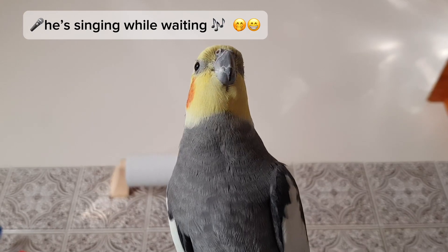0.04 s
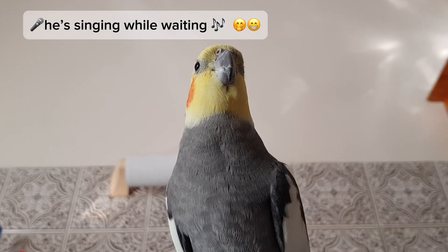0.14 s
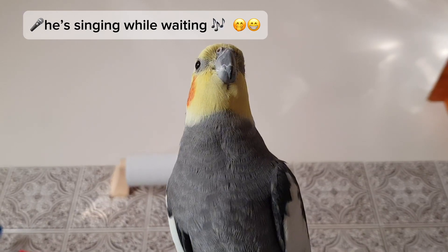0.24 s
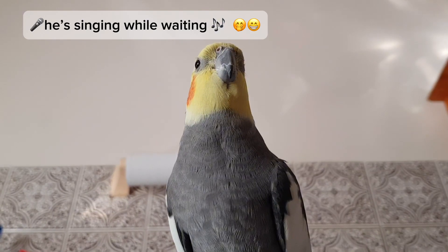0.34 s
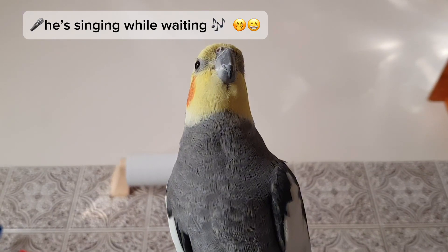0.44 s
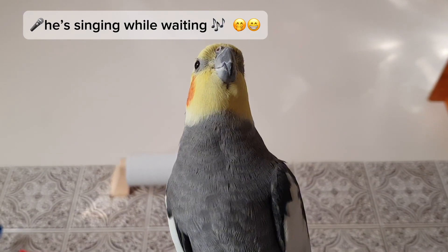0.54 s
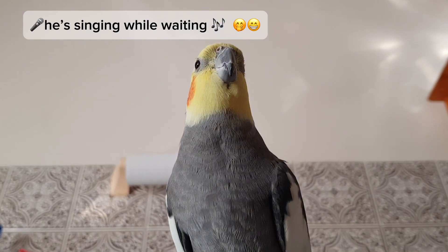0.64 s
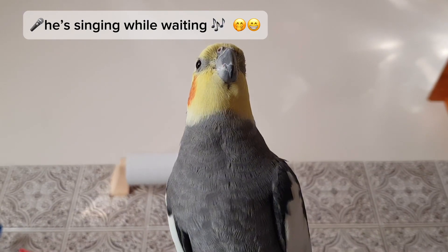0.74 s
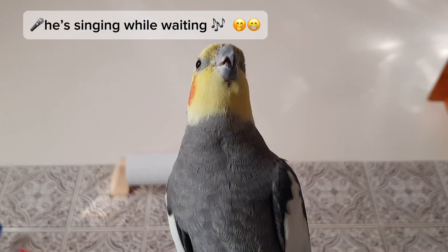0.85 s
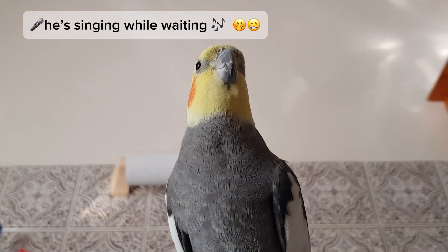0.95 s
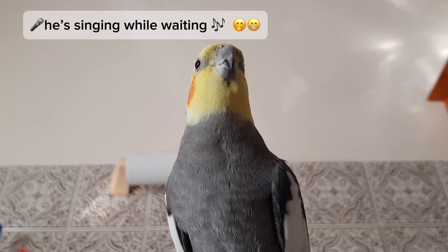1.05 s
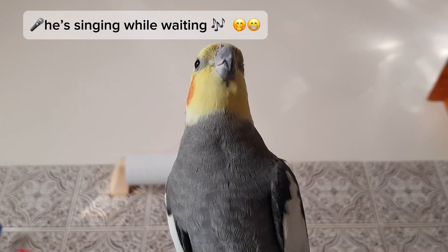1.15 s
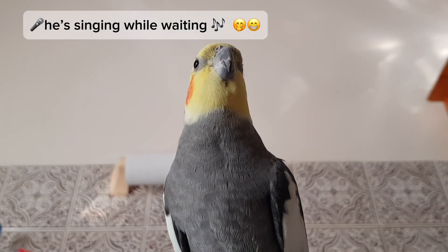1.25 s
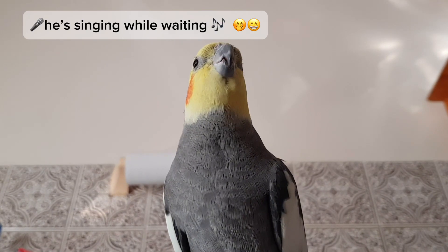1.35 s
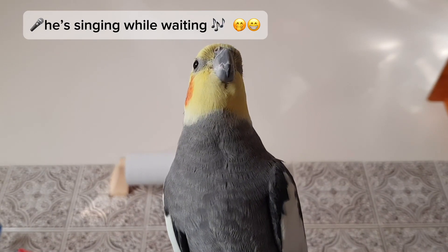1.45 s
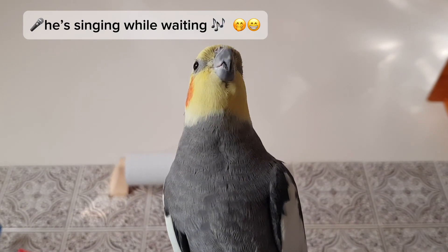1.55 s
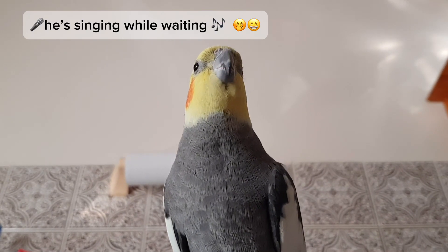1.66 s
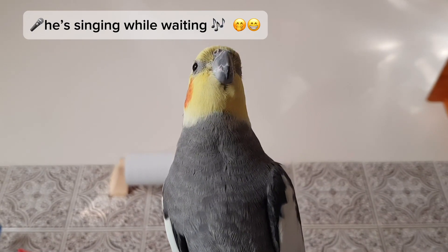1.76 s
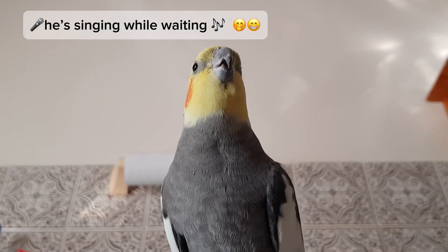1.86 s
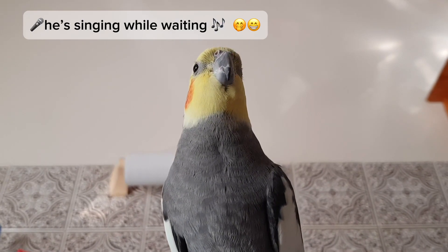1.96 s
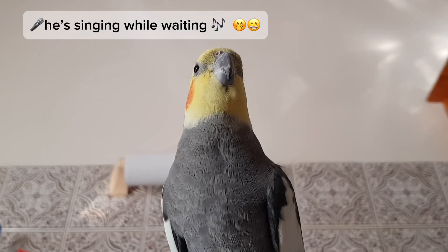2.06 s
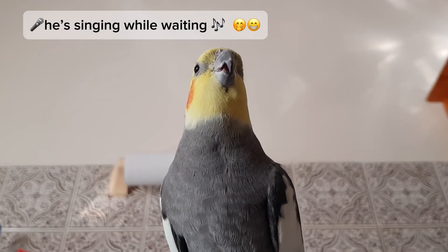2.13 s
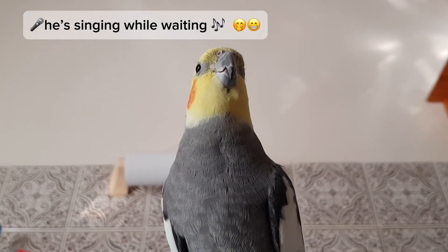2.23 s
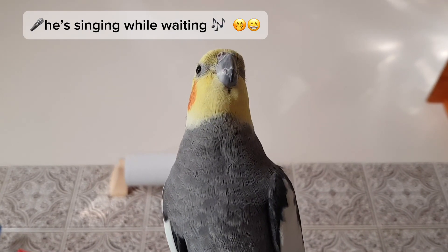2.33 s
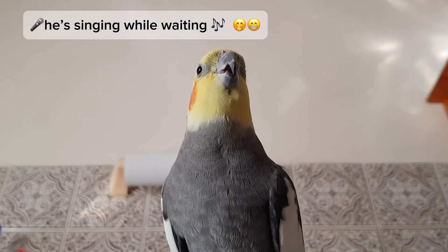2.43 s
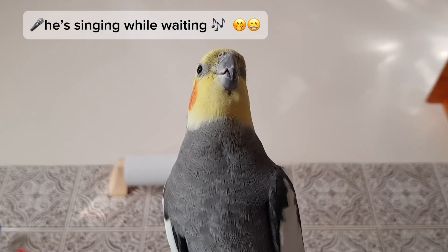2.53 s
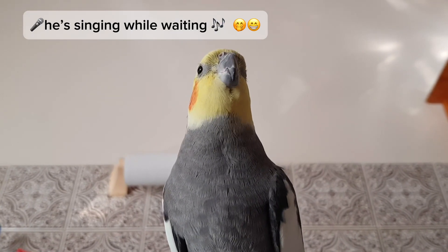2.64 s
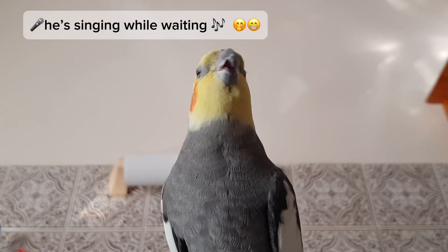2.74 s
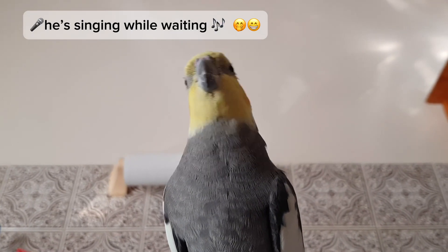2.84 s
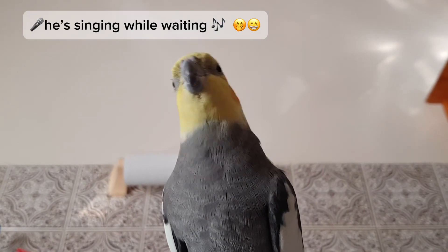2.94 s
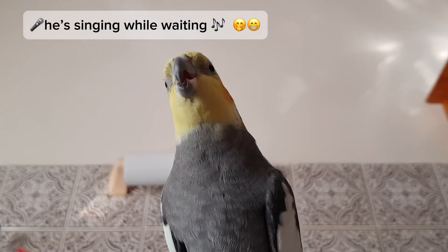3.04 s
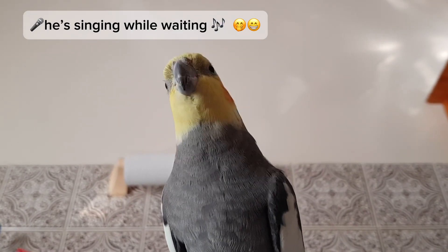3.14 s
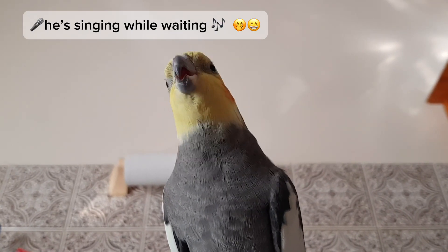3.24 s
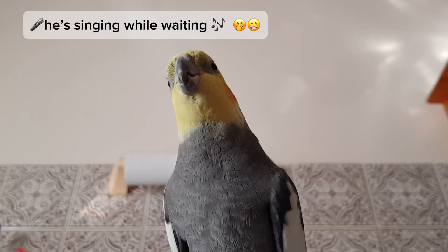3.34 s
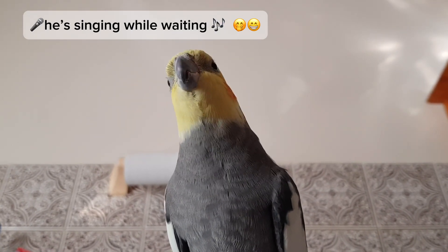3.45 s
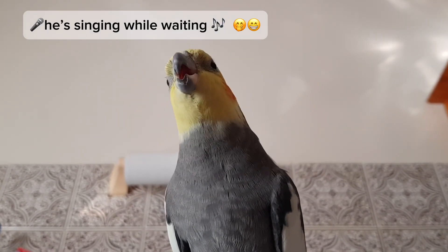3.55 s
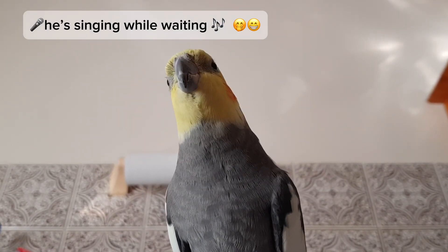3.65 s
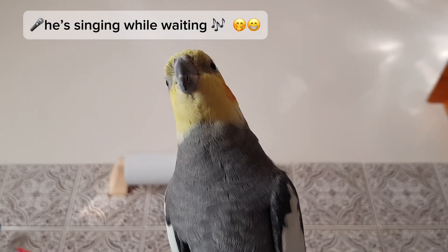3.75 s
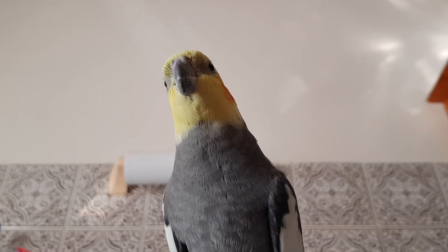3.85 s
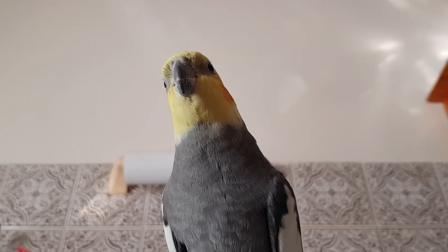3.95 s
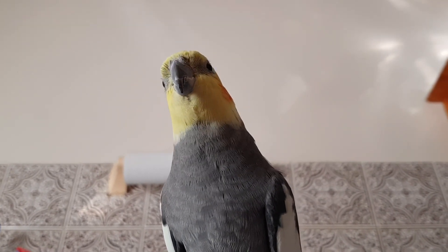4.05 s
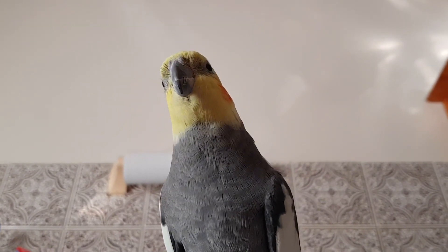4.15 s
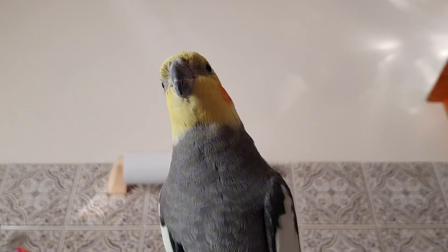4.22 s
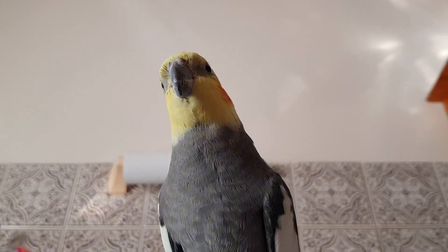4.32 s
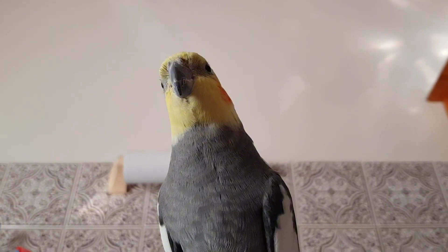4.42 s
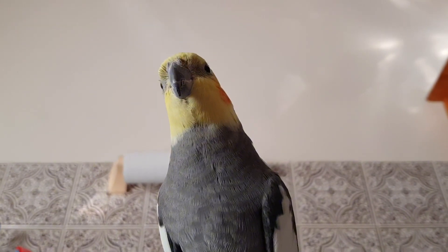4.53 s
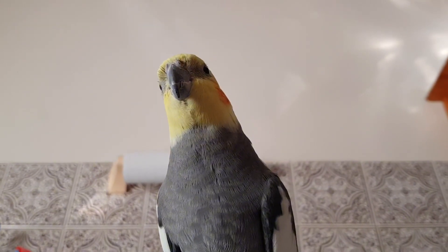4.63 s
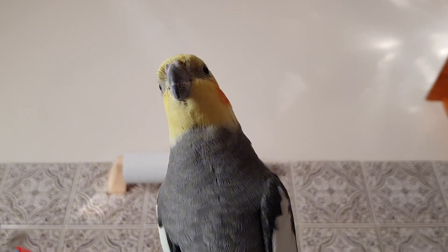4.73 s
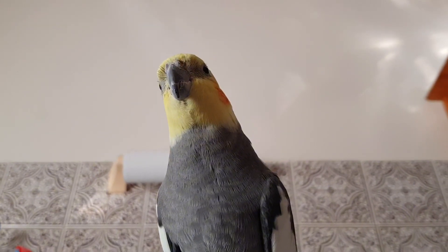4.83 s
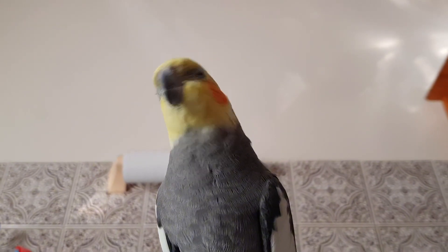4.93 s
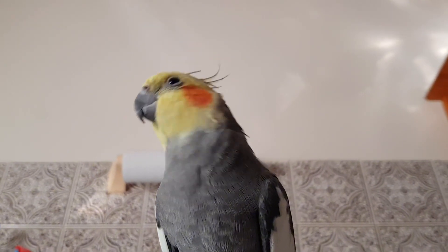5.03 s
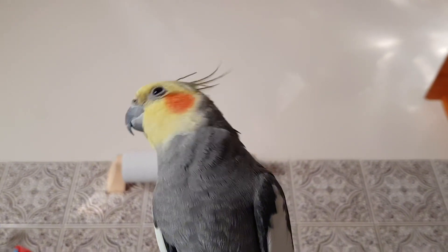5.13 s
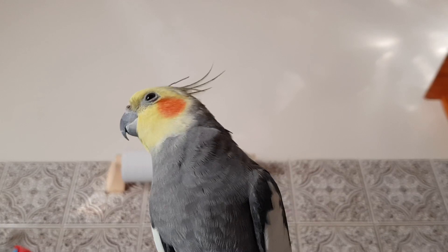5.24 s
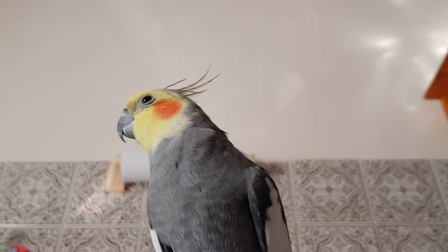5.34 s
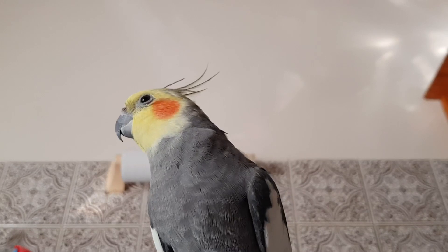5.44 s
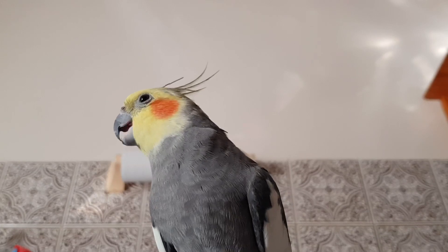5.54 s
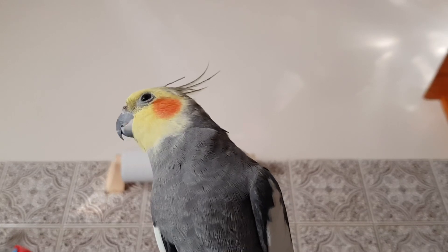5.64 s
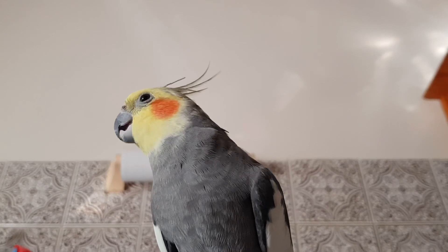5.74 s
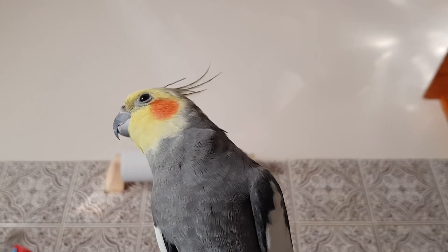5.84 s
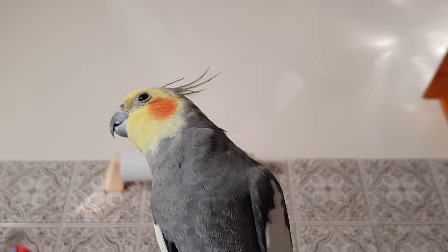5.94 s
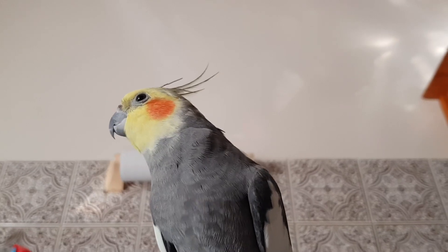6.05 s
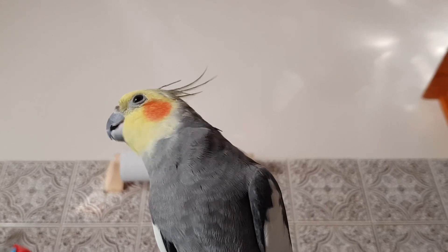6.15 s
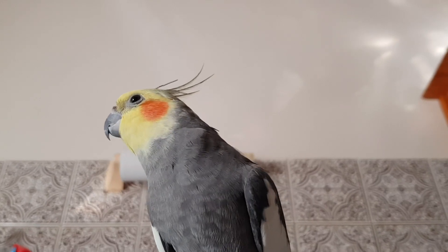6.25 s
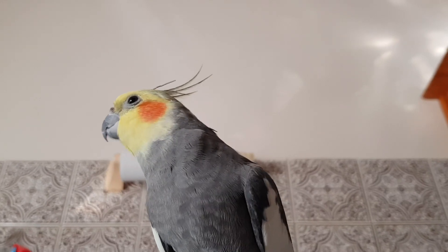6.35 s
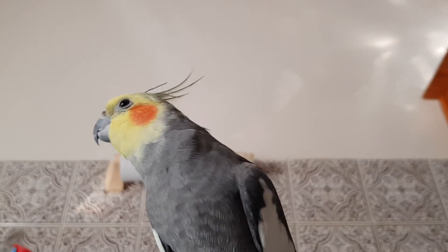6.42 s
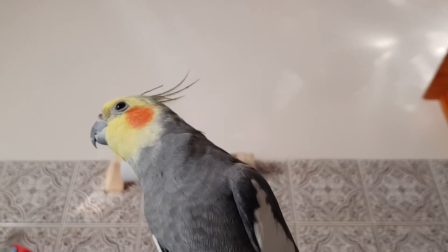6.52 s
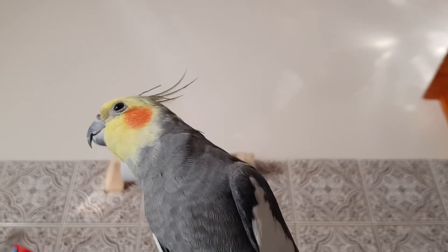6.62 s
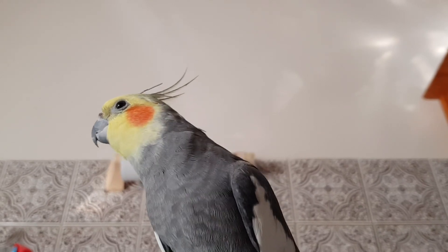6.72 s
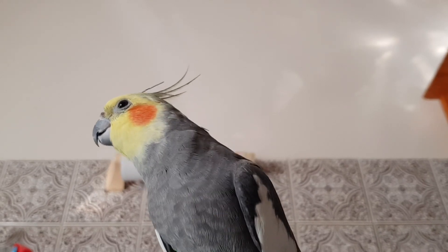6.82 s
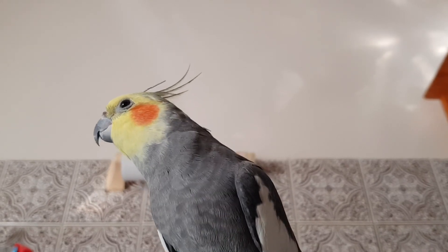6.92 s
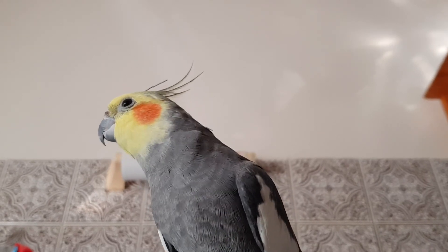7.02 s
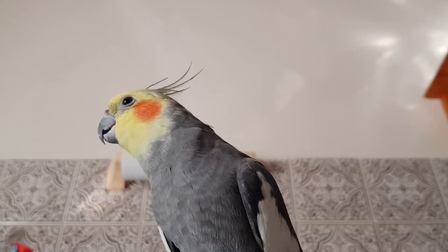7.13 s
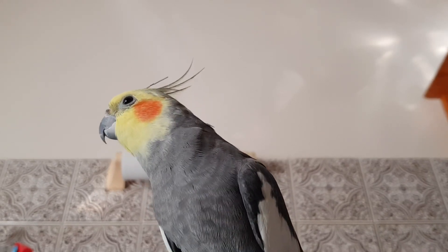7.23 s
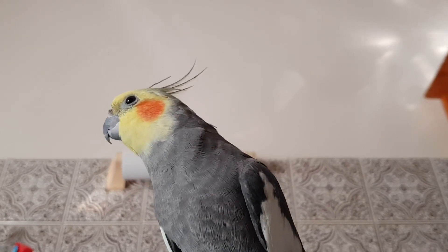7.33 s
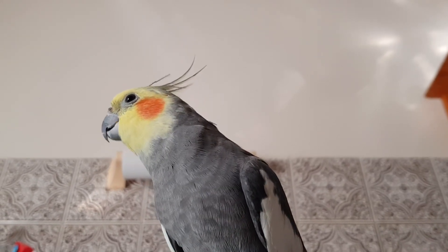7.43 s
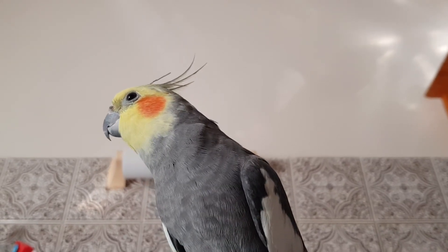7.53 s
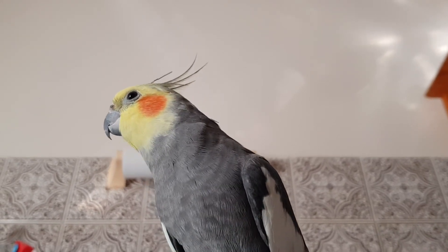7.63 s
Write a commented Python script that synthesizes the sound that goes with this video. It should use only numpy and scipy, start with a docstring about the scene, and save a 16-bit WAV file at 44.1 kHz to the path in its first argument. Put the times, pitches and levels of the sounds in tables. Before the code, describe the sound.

A cockatiel close by whistles a run of short bright rising notes, pauses, then gives softer raspy squawks and nasal chirps over faint room hum.

```python
"""A quiet room hums; then a cockatiel sings close by: eleven loud scooped whistles and three faint notes.
After a pause come four raspy squawks and four arched, nasal calls; far outside an engine gathers speed.
The voice is a harmonic stack plus torn half-order lines, coloured by the throat; sips are banded noise.
Hum and engine are sines over shaped noise; reverberation is banded decaying noise."""
import sys
import numpy as np
from scipy import signal
from scipy.fft import rfft, irfft
from scipy.io import wavfile
from scipy.ndimage import uniform_filter1d

SR = 44100
rng = np.random.default_rng(int(sys.argv[2]) if len(sys.argv) > 2 else 0)


def put_to_file(sound):
    """Save the sound as 16-bit audio at rate SR, in the file named by the first command-line argument."""
    columns = np.atleast_2d(sound).T  # one column per channel
    safe = np.clip(columns, -1, 1)
    whole_steps = np.round(safe * 32767)
    wavfile.write(sys.argv[1], SR, whole_steps.astype(np.int16))


N = 338688
TIME = np.arange(N) / SR
CUTOFF_HZ = 15900


def from_db(db):
    """Decibels to amplitude ratio."""
    return 10 ** (np.asarray(db) / 20)


def rms_one(x):
    """Scale to unit rms."""
    return x / np.sqrt(np.mean(x ** 2) + 1e-20)


def at_hz(points, hz):
    """Read a spectrum on a log-frequency axis."""
    known_hz, values = np.transpose(points)
    return np.interp(np.log(np.maximum(hz, 1)), np.log(known_hz), values)


def noise(colour, size):
    """Noise with a given spectrum; rms 1."""
    hz = np.arange(size // 2 + 1) * SR / size
    gain = from_db(at_hz(colour, hz))
    return rms_one(irfft(rfft(rng.standard_normal(size)) * gain, size))


def spread(colour, side_db):
    """Stereo noise: a part common to both channels plus a weaker part in opposite phase."""
    common = noise(colour, size=N)
    opposed = noise(colour, size=N) * [[1], [-1]]
    return common + from_db(side_db) * opposed


def wander(t, rate_hz):
    """Random values of zero mean and unit spread, drawn at rate_hz and joined by straight lines."""
    return np.interp((t - t[0]) * rate_hz, np.arange(4096), rng.standard_normal(4096))


def note_time(start_s, length_s):
    """The samples that a note covers, and its age in seconds at each."""
    at, size = int(start_s * SR), int(length_s * SR)
    return slice(at, at + size), TIME[:size]


def envelope_db(age, onset_db, attack_s, hold_s, fall_db_per_s):
    """Ease up from the onset level to 0 dB, hold, then fall steadily."""
    rise_db = onset_db * np.clip(1 - age / attack_s, 0, 1) ** 1.24
    return rise_db - fall_db_per_s * np.maximum(age - attack_s - hold_s, 0)


def bump(age, at_s, width_s):
    """A smooth rise to 1 and back."""
    return np.exp(-((age - at_s) / width_s) ** 2)


def glide(age, times, pitches):
    """Pitch gliding through a few turning points, with rounded corners."""
    return uniform_filter1d(np.interp(age, times, pitches), size=400, mode="nearest")


# Reverberation decay. Each row: frequency in Hz, nominal 60 dB decay time in s.
ROOM_T60 = [(500, 0.26), (1500, 0.3477), (3000, 0.19), (6000, 0.2947), (12000, 0.25), (16000, .22)]
# Share of the voice spreading into the room. Each row: frequency in Hz, level in dB.
ROOM_SHARE = [(500, 0.94), (3000, 1), (5000, 0.84), (9000, 0), (15000, 0.77)]


def room(x, lingering_db=-21, lingering=2.4):
    """Diffuse reverberation, different at each ear: band decay times differ and a weak part lingers."""
    t = np.arange(SR * 3 // 4) / SR
    edges_hz = np.geomspace(250, 18000, 13)
    hz = np.arange(len(t) // 2 + 1) * SR / len(t)
    white = rfft(rng.standard_normal((2, len(t))))
    tail = 0
    for low, high in zip(edges_hz, edges_hz[1:]):
        band = irfft(white * ((hz >= low) & (hz < high)), len(t))
        centre_hz = np.sqrt(low * high)
        fall = np.log(1000) * t / at_hz(ROOM_T60, centre_hz)
        decay = np.exp(-fall) + from_db(lingering_db) * np.exp(-fall / lingering)
        decay = decay * np.clip(t / 0.002, 0, 1)   # the nearest surfaces answer almost at once
        tail = tail + band * decay / np.linalg.norm(decay) * from_db(at_hz(ROOM_SHARE, centre_hz))
    return signal.fftconvolve(x[None], tail, axes=1)[:, :N]


def place(x, lag_ms, right_db, wet_db):
    """The sound reaches the right microphone a little later and louder; the room answers in both."""
    delay = np.exp(-2j * np.pi * np.arange(N // 2 + 1) * SR / N * lag_ms / 1000)
    left = x * from_db(-right_db / 2)
    right = irfft(rfft(x) * delay, N) * from_db(right_db / 2)
    return np.array([left, right]) + from_db(wet_db) * room(x)


def rasp(t, pitch, phase, colour, tear_hz, bright_db, clump_db=3.0):
    """Irregular flapping: the period doubles, each half-order line torn in strength and phase; rms about 1."""
    out, power = 0, 0
    for half_order in np.arange(1, 26) / 2:
        hz = half_order * pitch
        treble = np.interp(hz, [2400, 3400], [0, 1])
        gain = from_db(at_hz(colour, hz) + bright_db * treble) * (hz < CUTOFF_HZ)
        torn_sine = wander(t, tear_hz) * np.sin(half_order * phase)
        torn_cosine = wander(t, tear_hz) * np.cos(half_order * phase)
        out = out + gain * (torn_sine + torn_cosine)
        power = power + gain ** 2
    return out / np.sqrt(power) * from_db(clump_db * wander(t, 310))


def syrinx(t, pitch, tone_db, overtone_db, rasp_db, throat, rasp_colour, jitter, rough_jitter,
           tear_hz, flutter_db, muffle_db=0, upper_db=0, waver_db=0):
    """One note: a harmonic stack coloured by the throat; the rougher it is, the more its pitch shakes."""
    rasp_gain = from_db(rasp_db)
    roughness = rasp_gain / (rasp_gain + from_db(tone_db) + from_db(overtone_db))
    shake = jitter * wander(t, 450) + rough_jitter * roughness * wander(t, 900)
    phase = 2 * np.pi * np.cumsum(pitch * (1 + shake)) / SR
    note = from_db(tone_db) * np.sin(phase)
    for k in range(2, 14):
        # a closed beak swallows the low overtones
        colour_db = at_hz(throat, k * pitch) + upper_db * (k > 2) - muffle_db * (k < 4)
        flutter = flutter_db * np.log(k) * wander(t, 179.46)   # high overtones are the least steady
        gain = from_db(overtone_db + colour_db + flutter) * (k * pitch < CUTOFF_HZ)
        note += gain * np.sin(k * phase)
    fade_in = np.clip(t / 0.004, 0, 1)
    fade_out = np.clip((t[-1] - t) / 0.0033, 0, 1)
    fade = from_db(waver_db * wander(t, 200)) * fade_in * fade_out
    bright_db = np.clip(0.35 * (overtone_db - tone_db), -12, 3)   # a slack voice has a duller rasp too
    torn = rasp_gain * rasp(t, pitch, phase, rasp_colour, tear_hz, bright_db)
    return fade * (np.sqrt(2) * note + torn)


# Mains lines and a thin whine. Each row: frequency in Hz, level in dB before wavering and balance.
HUM = [(100.1, -60.5), (200.2, -68.5), (300.3, -79.5), (5570, -99)]
# Far engine. Each row: time in s, firing rate in Hz, level in dB before balance.
ENGINE = [(4.0, 99.5, -87), (4.25, 103.9, -67.5), (5.0, 113, -75), (5.5, 116.1, -62), (6.0, 121.1, -58.5),
          (6.5, 122.5, -54), (6.85, 123.8, -54), (7.1, 130.4, -56), (7.68, 138.7, -58.5)]
# Engine rumble spectrum. Each row: frequency in Hz, relative density in dB.
ENGINE_NOISE = [(18, -46.5), (30, -21), (69, -10), (108, -9), (157, -12.5), (199, -6.5), (325, -18),
                (600, -21), (780, -45), (1320, -120)]
# Room rumble and hiss spectrum. Each row: frequency in Hz, relative density in dB.
AMBIENCE = [(20, -26.5), (45, -2), (70, -3.5), (100, -6.5), (150, -8), (190, -1), (260, -11), (400, -16.5),
            (600, -17), (1000, -35), (2000, -40.5), (8000, -44.5), (11000, -39), (15800, -33.5)]


def background():
    """Mains hum, room rumble and hiss, and the engine's two-harmonic drone and noise through the walls."""
    hum = 0
    for hz, db in HUM:
        gain = np.sqrt(2) * from_db(db + 0.72 * wander(TIME, 5))
        hum = hum + gain * np.sin(2 * np.pi * (hz * TIME + rng.random()))
    time_s, firing_hz, engine_db = np.transpose(ENGINE)
    phase = 2 * np.pi * np.cumsum(np.interp(TIME, time_s, firing_hz)) / SR
    harmonics = np.sin(phase) + from_db(-21.5) * np.sin(2 * phase)
    drone = np.sqrt(2) * from_db(np.interp(TIME, time_s, engine_db)) * harmonics
    rumble_db = np.interp(TIME, [5.2, 6.4, 7.68], [-85, -59, -57])   # grows as it nears
    rumble = from_db(rumble_db) * spread(ENGINE_NOISE, side_db=-12)
    ambience = from_db(-65.0) * spread(AMBIENCE, side_db=-4.0)
    return (hum + drone + rumble + ambience) * from_db([[-3], [2.2]])


# Whistles. Each row: start in s, length in s before release, starting, knee and final pitch in Hz,
# level in dB before placement, overtones and rasp in dB relative to it.
WHISTLES = [ (0.618, 0.013, 1950, 2155, 2015, -51, -18, -14),
            (0.855, 0.05, 2060, 2508, 2039, -18.5, -3.5, -33.5),
            (1.072, 0.068, 2155, 2559, 2810, -13.5, -3.5, -31.5),
            (1.329, .065, 1896, 2407, 2241, -16.5, -4.5, -32.5),
            (1.596, .069, 1982, 2524, 2578, -13, -5.5, -34.5),
            (1.662, 0.017, 1720, 1856, 1650, -52, -15, -1),
            (1.844, .073, 1980, 2593, 2866, -12.5, -3.5, -31),
            (2.126, 0.07, 2150, 2652, 3030, -10.5, -7, -31),
            (2.433, 0.079, 2217, 2733, 2842, -11, -4.5, -37),
            (2.705, .073, 2050, 2764, 3019, -8.5, -4, -38), (2.979, 0.07, 2130, 2863, 3049, -11, -2.5, -35),
            (3.233, 0.085, 1997, 2730, 3058, -13, -2.5, -39),
            (3.483, .073, 2127, 2813, 3038, -11.5, -4, -37), (3.596, 0.036, 1740, 1705, 1500, -59, -30, -1)]
# Throat and beak on the overtones. Each row: frequency in Hz, gain in dB.
WHISTLE_THROAT = [(4000, -7.5), (4700, -29.5), (5800, -31), (7200, -46), (8800, -42), (10500, -33.5),
                  (12000, -24), (14000, -32.5), (16000, -39.5)]
# Rasp of the crack. Each row: frequency in Hz, relative gain in dB.
CRACK_COLOUR = [(500, -28), (1200, -21.5), (2000, 5), (2800, 5), (4000, -11), (7500, -19.5), (10000, -9),
                (13000, -10), (16000, -10)]
SCOOP_SHARE, KNEE_SHARE, GLIDE_END_SHARE = 0.06, 0.36, 0.93   # shares of the note's length
WHISTLE_ONSET_DB, ATTACK_SHARE, HOLD_SHARE, SWELL_DB_PER_LENGTH = -28.5, 0.49, 0.45, 1.5
WHISTLE_RELEASE_S, WHISTLE_FALL_DB_PER_S = 0.016, 829
CRACK_SHARE, CRACK_FALL_DB_PER_S, CRACK_REST_DB = 0.31, 1000.5, -26
BEAK_OPENS_S, BEAK_CLOSED_DB, BEAK_OPEN_DB = 0.014, 6, -0.5   # loss of harmonics 2 and 3


def whistles():
    """Nearly pure notes scoop to a knee, where the voice cracks and the beak opens, then glide and swell."""
    out = np.zeros(N)
    for start, length, *pitches, level_db, overtone_db, rasp_db in WHISTLES:
        span, age = note_time(start, length + WHISTLE_RELEASE_S)
        pitch = glide(age / length, [SCOOP_SHARE, KNEE_SHARE, GLIDE_END_SHARE], pitches)
        tone_db = level_db + envelope_db(
            age, WHISTLE_ONSET_DB, ATTACK_SHARE * length, HOLD_SHARE * length, WHISTLE_FALL_DB_PER_S)
        swell_db = SWELL_DB_PER_LENGTH * (age / length - ATTACK_SHARE - HOLD_SHARE)
        since_crack = age - CRACK_SHARE * length
        crack_db = np.maximum(-CRACK_FALL_DB_PER_S * np.abs(since_crack), CRACK_REST_DB)
        beak_db = np.interp(since_crack / BEAK_OPENS_S, [-0.5, 0.5], [BEAK_CLOSED_DB, BEAK_OPEN_DB])
        out[span] += syrinx(
            age, pitch, tone_db + swell_db, tone_db + overtone_db, level_db + rasp_db + crack_db,
            WHISTLE_THROAT, CRACK_COLOUR, jitter=0.0071, rough_jitter=0.096, tear_hz=2370,
            flutter_db=5.0, muffle_db=beak_db)
    return place(out, lag_ms=0.1293, right_db=5.0, wet_db=-5.5)


# Faint sips of air. Each row: start in s, length in s, centre in Hz, level in dB before fade and placement.
SIPS = [(0.746, 0.086, 4770, -77), (2.067, 0.072, 7240, -73.5), (2.909, 0.14, 6050, -69),
        (3.771, 0.077, 5100, -84.5), (4.761, 0.07, 4560, -81.5)]


def sips():
    """The bird draws air through its beak: a soft band of hiss."""
    out = np.zeros(N)
    for start, length, hz, level_db in SIPS:
        span, age = note_time(start, length)
        size = len(age)
        hiss = noise([(hz / 2, -40), (hz, 0), (hz * 2.0, -40)], size=size)
        out[span] += from_db(level_db) * np.hanning(size) ** 0.5 * hiss
    return place(out, lag_ms=0.099, right_db=11.0, wet_db=-2.0)


# Squawks. Each row: start in s, length in s, break after s, starting, knee, break and rasp pitch in Hz,
# fundamental in dB, overtones at knee and at break in dB, extra on harmonics above 2 in dB, rasp in dB;
# levels before placement.
SQUAWKS = [ (5.722, 0.15, 0.083, 1163, 1620, 1740, 1783, -61.5, -37.5, -27, -8, -45),
           (5.927, 0.11, 0.052, 1427, 2186, 2515, 2402, -39.5, -33, -48, 8.5, -39.5),
           (6.118, .153, .057, 1438, 1961, 1758, 2147, -38, -16.5, -27, -3, -33),
           (6.357, 0.13, .058, 1385, 2060, 1592, 2120, -39.5, -29, -24, -10.5, -31.5)]
# Throat on squawks and arched calls. Each row: frequency in Hz, gain in dB.
CALL_THROAT = [(2300, -6), (3000, 7), (3700, -7.5), (4500, -16.5), (5500, -28.5), (6500, -33), (8000, -50),
               (9600, -38), (11000, -36.5), (12800, -23.5), (14300, -38), (15400, -46)]
# Rasp of squawks and arched calls. Each row: frequency in Hz, relative gain in dB.
RASP_COLOUR = [(350, -65), (700, -17), (1100, -2), (2200, 2.5), (3200, 6), (4400, -6), (5600, -17.5),
               (7500, -35.5), (10000, -18), (12800, -6.5), (16000, -17)]
SQUAWK_SCOOP_S, KNEE_PUSH_DB, KNEE_WIDTH_S = 0.032, 8.5, 0.013
RING_ONSET_DB, RING_ATTACK_S, RING_FALL_DB_PER_S = -49.5, 0.011, 482
JUMP_SHARE, SINK_SHARE, SINK_TO_HZ = 0.085, 0.6, 1204   # shares of the time after the break
RASP_ONSET_DB, RASP_HOLD_S, RASP_FALL_DB_PER_S = -6, 0.025, 189


def squawks():
    """Notes scoop up to a knee, ring briefly in the overtones and break into a rasp that dies away."""
    out = np.zeros(N)
    for (start, length, break_s, *pitches, torn_hz,
         level_db, knee_db, break_db, upper_db, rasp_db) in SQUAWKS:
        span, age = note_time(start, length)
        rasp_turns = break_s + (length - break_s) * np.array([0, JUMP_SHARE, SINK_SHARE, 1])
        pitch = glide(age, [0, SQUAWK_SCOOP_S, *rasp_turns], [*pitches, torn_hz, torn_hz, SINK_TO_HZ])
        tone_db = level_db + KNEE_PUSH_DB * bump(age, SQUAWK_SCOOP_S, KNEE_WIDTH_S)
        ring_db = np.interp(age, [SQUAWK_SCOOP_S, break_s], [knee_db, break_db])
        ring_db = ring_db + envelope_db(
            age - SQUAWK_SCOOP_S + RING_ATTACK_S, RING_ONSET_DB, RING_ATTACK_S,
            break_s - SQUAWK_SCOOP_S, RING_FALL_DB_PER_S)
        torn_db = rasp_db + envelope_db(age, RASP_ONSET_DB, break_s, RASP_HOLD_S, RASP_FALL_DB_PER_S)
        out[span] += syrinx(
            age, pitch, tone_db, ring_db, torn_db, CALL_THROAT, RASP_COLOUR, jitter=0.0048,
            rough_jitter=0.084, tear_hz=446, flutter_db=5.5, upper_db=upper_db, waver_db=-0.5)
    return out


# Arched calls. Each row: start in s, length in s, resting and top pitch in Hz, rebound from 0 to 1,
# resting fundamental in dB, overtones in dB, extra on harmonics above 2 in dB; levels before placement.
ARCHED_CALLS = [ (6.612, 0.15, 1406, 1744, 0.32, -38, -26.5, -1.5),
                (6.855, 0.15, 1358, 1823, 0.2, -37.5, -20, -1), (7.132, .150, 1388, 1811, 0.3, -37, -19, 0),
                (7.414, 0.16, 1287, 1695, 0.08, -43, -24, -3)]
ARCH_AT_S, ARCH_WIDTH_S, REBOUND_AT_S, REBOUND_WIDTH_S = 0.028, 0.024, 0.116, 0.0169
EFFORT_DB, END_SAG_HZ, END_SAG_S = 10.5, 93, 0.013
NASAL_ONSET_DB, NASAL_ATTACK_S, NASAL_HOLD_S, NASAL_FALL_DB_PER_S = -35, 0.032, 0.0036, 365
CALL_RASP_DB, CALL_RASP_FALL_DB_PER_S = -44.5, 187


def arched_calls():
    """Nasal notes: effort arches and rebounds, driving pitch and fundamental; pitch sags at the end."""
    out = np.zeros(N)
    for start, length, rest_hz, top_hz, rebound, level_db, overtone_db, upper_db in ARCHED_CALLS:
        span, age = note_time(start, length)
        arch = bump(age, ARCH_AT_S, ARCH_WIDTH_S)
        effort = arch + rebound * bump(age, REBOUND_AT_S, REBOUND_WIDTH_S)
        pitch = rest_hz + (top_hz - rest_hz) * effort - END_SAG_HZ * bump(age, length, END_SAG_S)
        nasal_db = overtone_db + envelope_db(
            age, NASAL_ONSET_DB, NASAL_ATTACK_S, NASAL_HOLD_S, NASAL_FALL_DB_PER_S)
        rasp_db = CALL_RASP_DB - CALL_RASP_FALL_DB_PER_S * age
        out[span] += syrinx(
            age, pitch, level_db + EFFORT_DB * effort, nasal_db, rasp_db, CALL_THROAT, RASP_COLOUR,
            jitter=0.01, rough_jitter=0.17, tear_hz=834, flutter_db=4.5, upper_db=upper_db, waver_db=2.0)
    return out


def scene():
    """The bird over the quiet of the house; it turns its head aside before the squawks and calls."""
    quiet = background()
    song = whistles()
    breaths = sips()
    turned_aside = place(squawks() + arched_calls(), lag_ms=0.2, right_db=3.5, wet_db=-1.5)
    return quiet + song + breaths + turned_aside


def record(dry):
    """A steep elliptic low-pass cuts the top."""
    lowpass = signal.ellip(12, 0.1, 80, CUTOFF_HZ, fs=SR, output="sos")
    return signal.sosfilt(lowpass, dry)


dry = scene()
out = record(dry)
put_to_file(out)
```